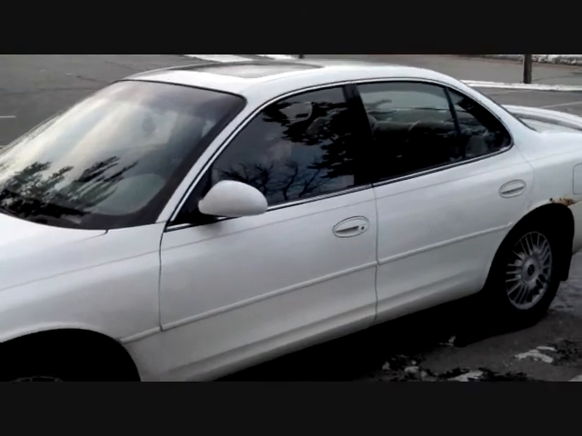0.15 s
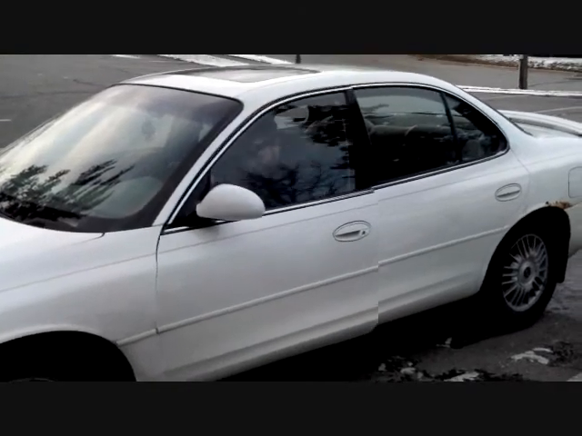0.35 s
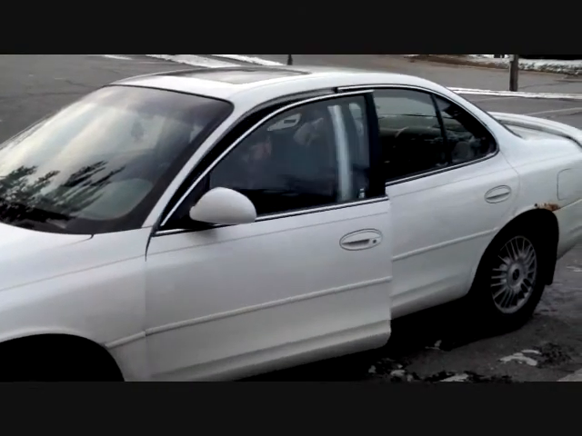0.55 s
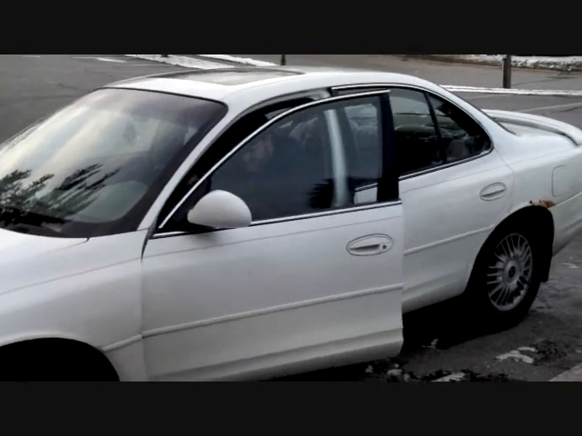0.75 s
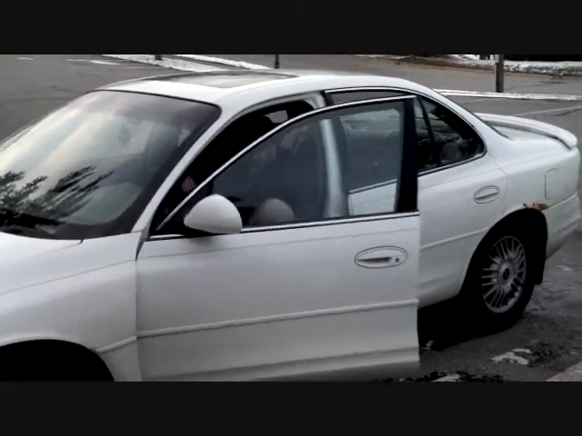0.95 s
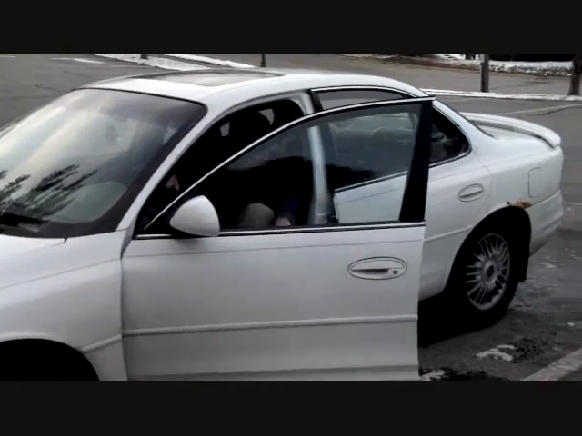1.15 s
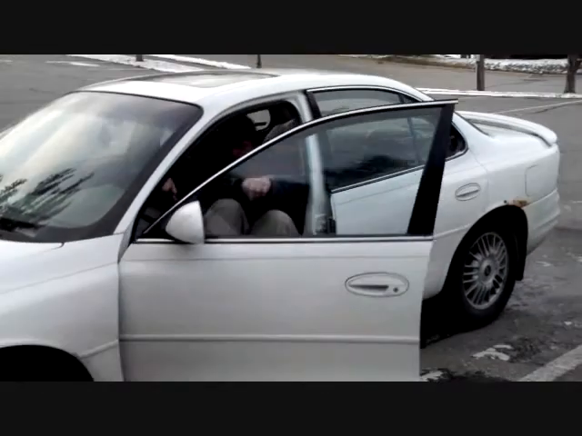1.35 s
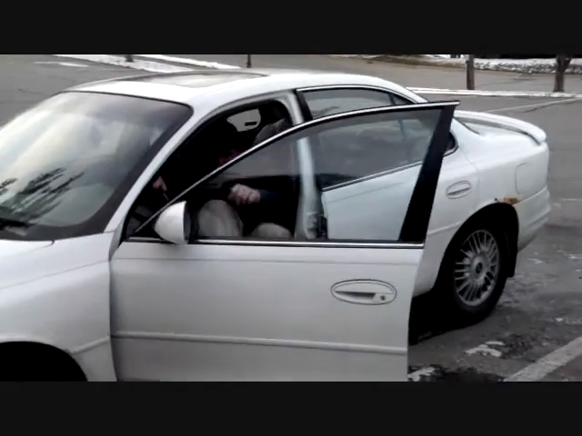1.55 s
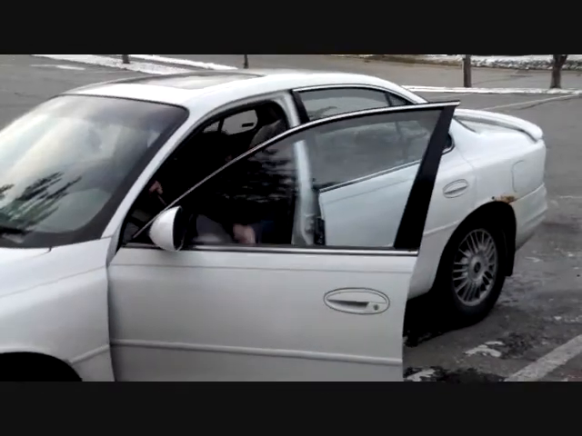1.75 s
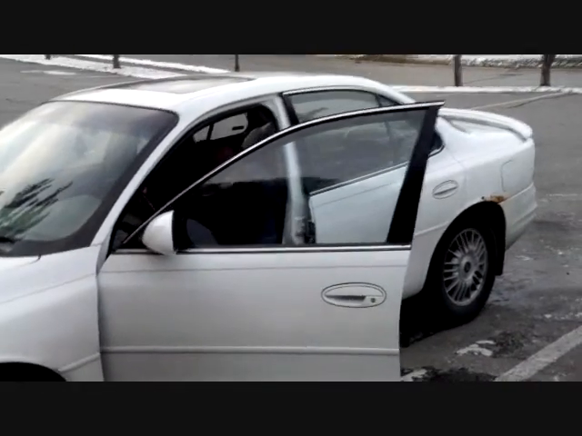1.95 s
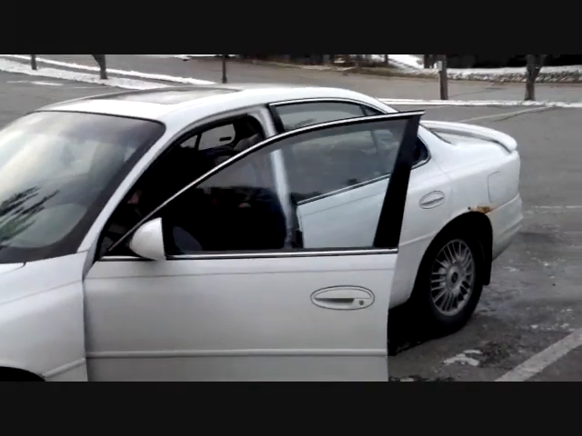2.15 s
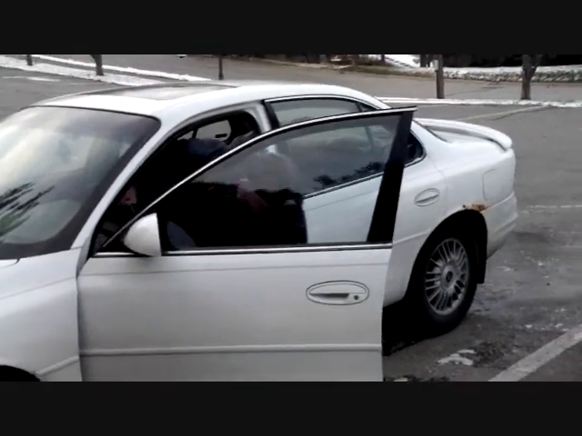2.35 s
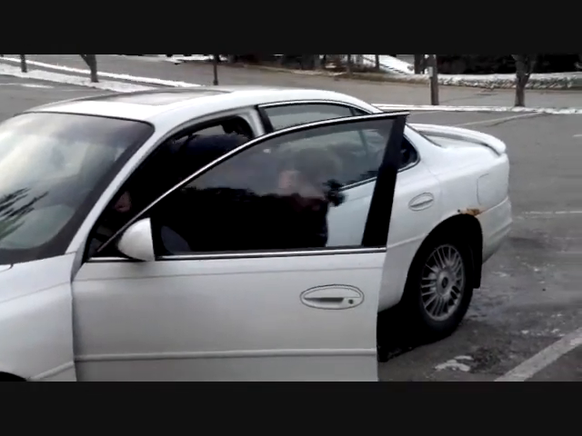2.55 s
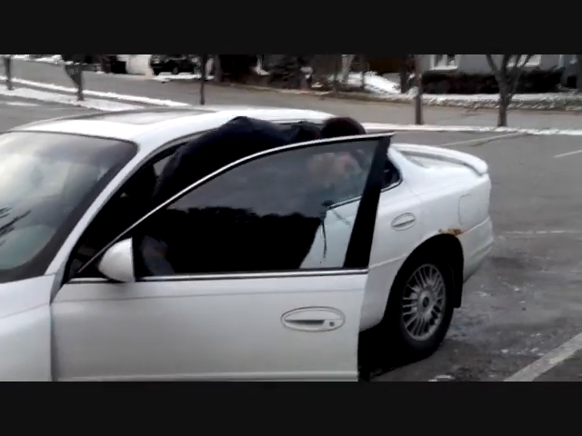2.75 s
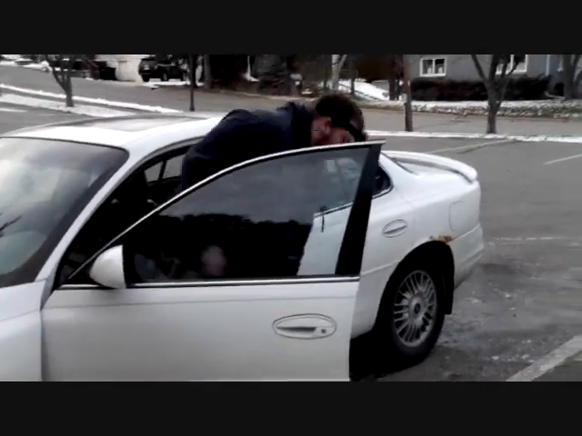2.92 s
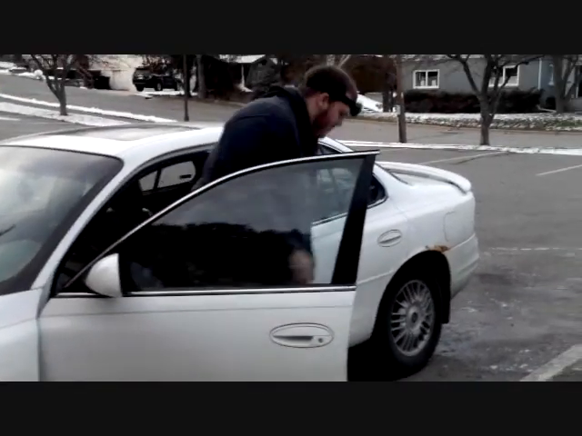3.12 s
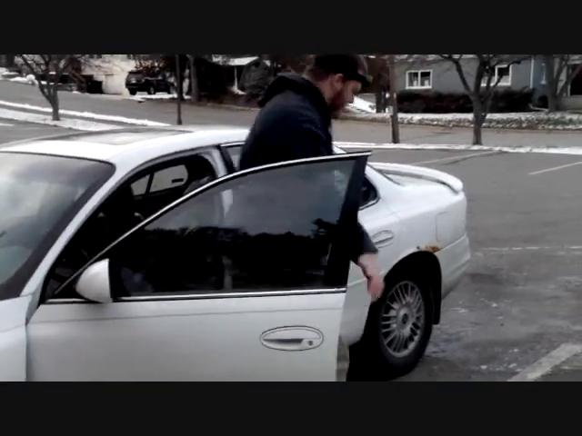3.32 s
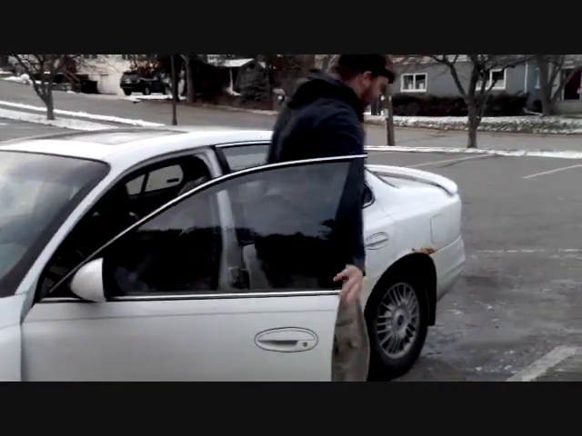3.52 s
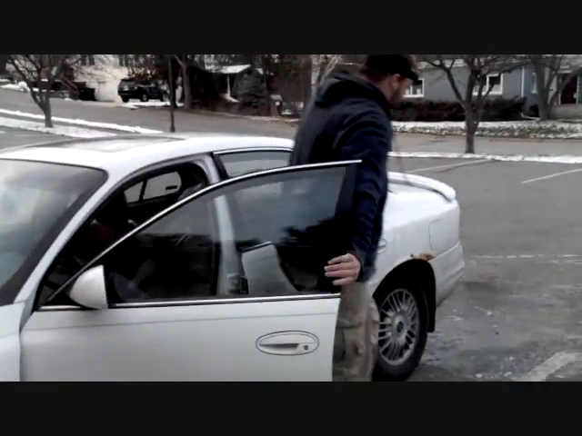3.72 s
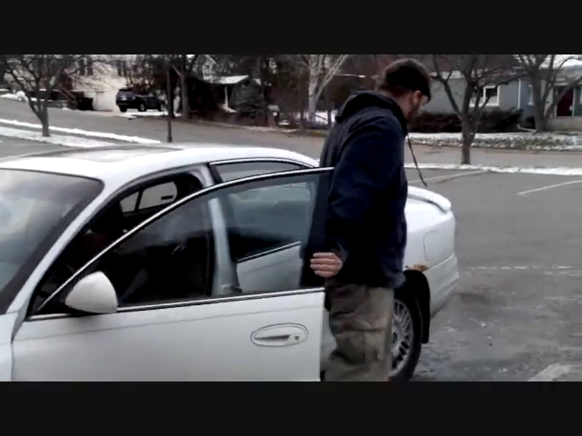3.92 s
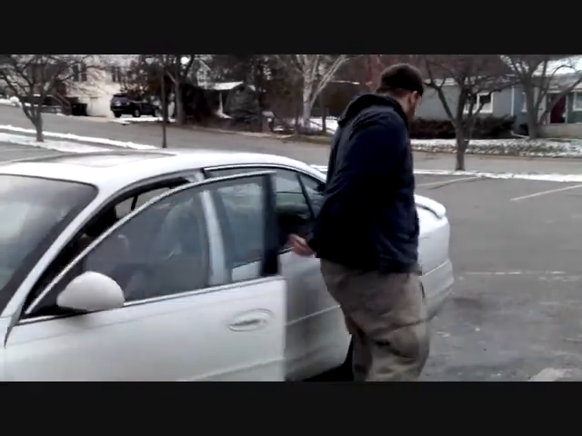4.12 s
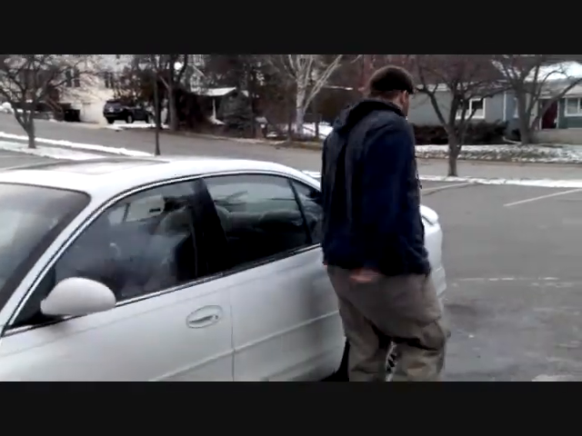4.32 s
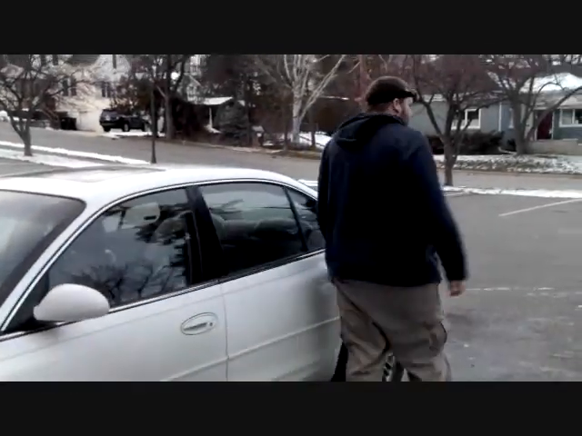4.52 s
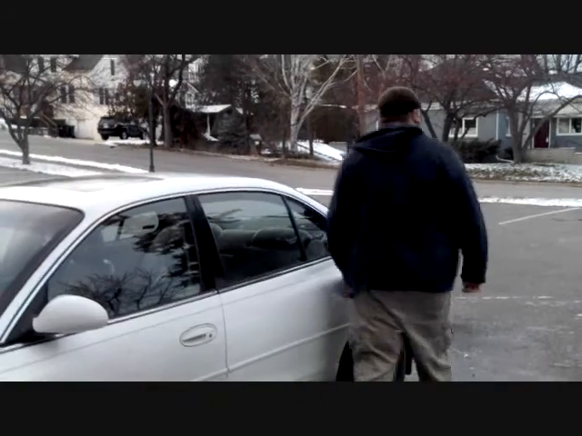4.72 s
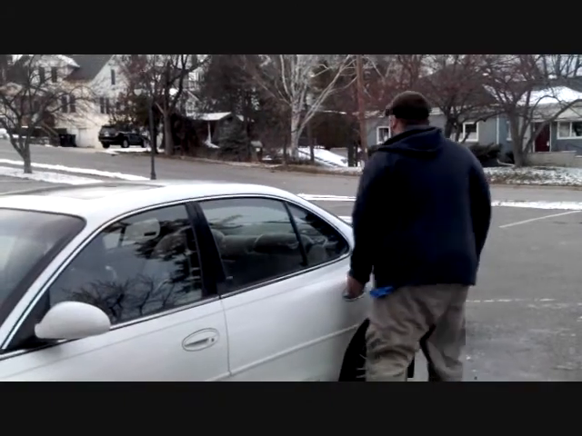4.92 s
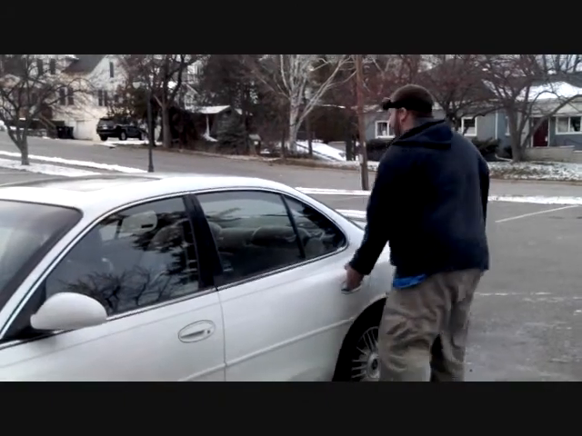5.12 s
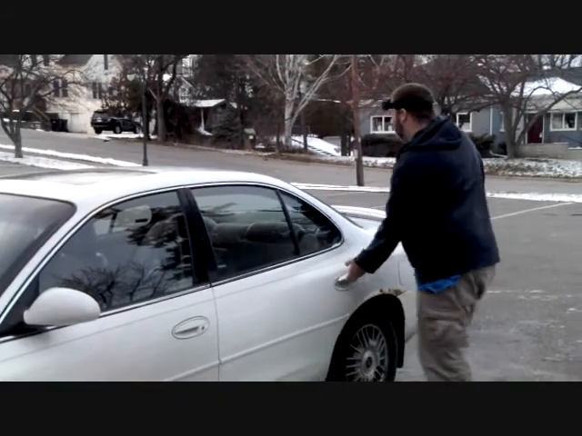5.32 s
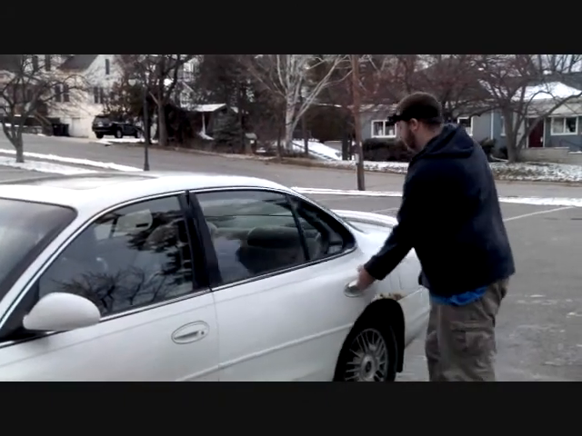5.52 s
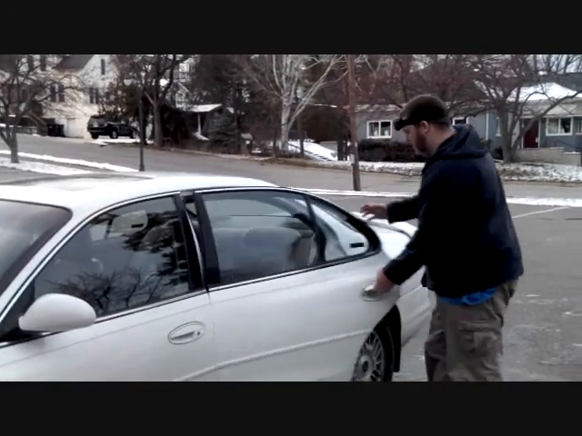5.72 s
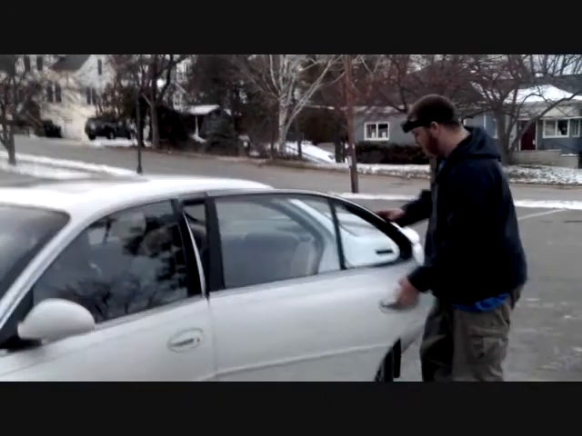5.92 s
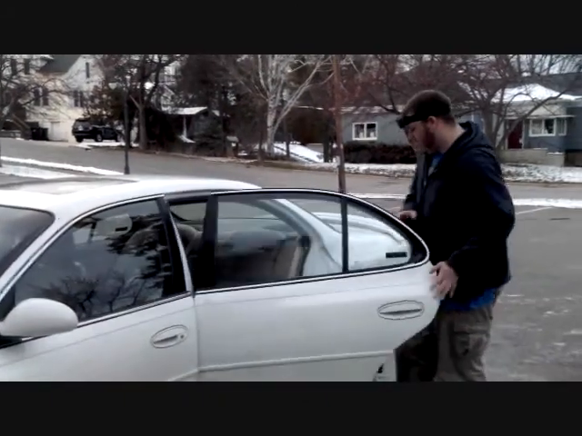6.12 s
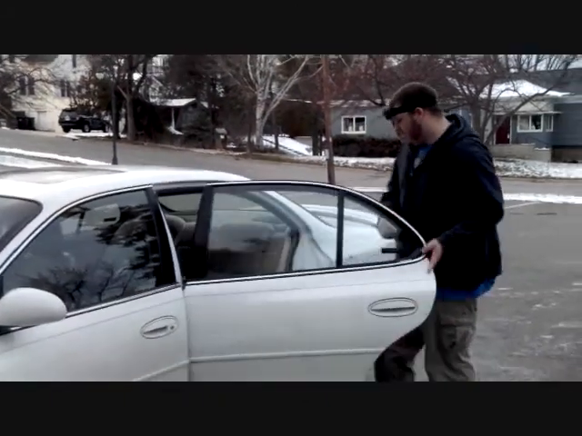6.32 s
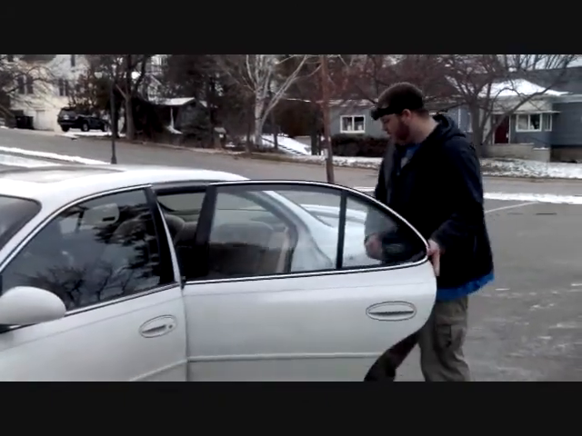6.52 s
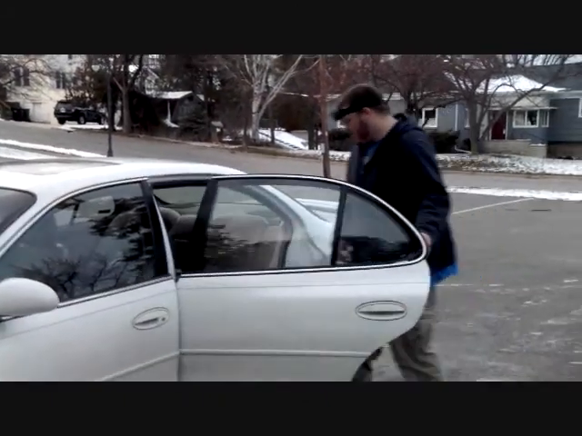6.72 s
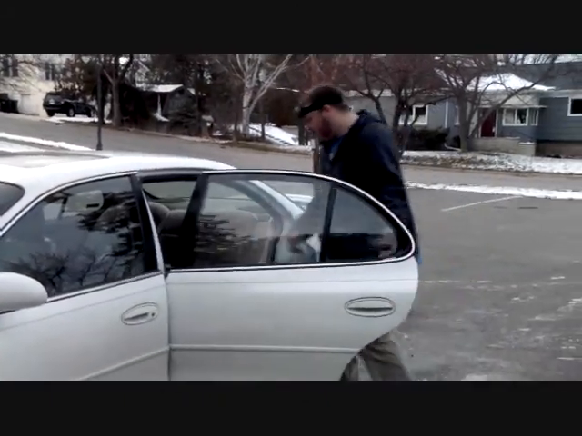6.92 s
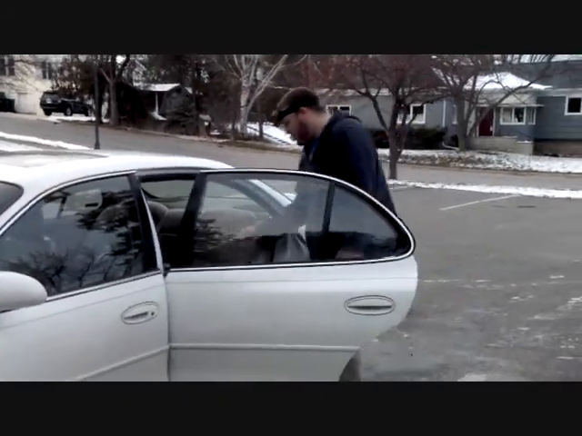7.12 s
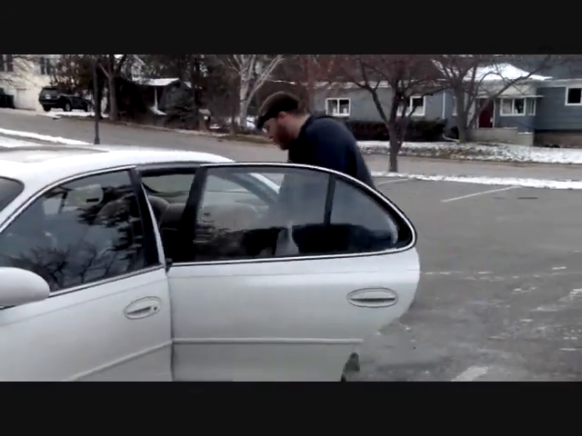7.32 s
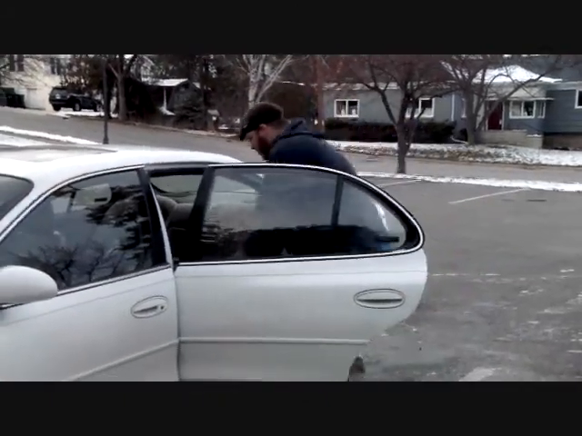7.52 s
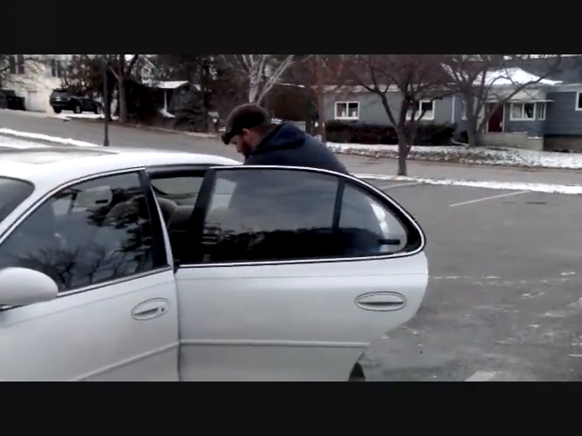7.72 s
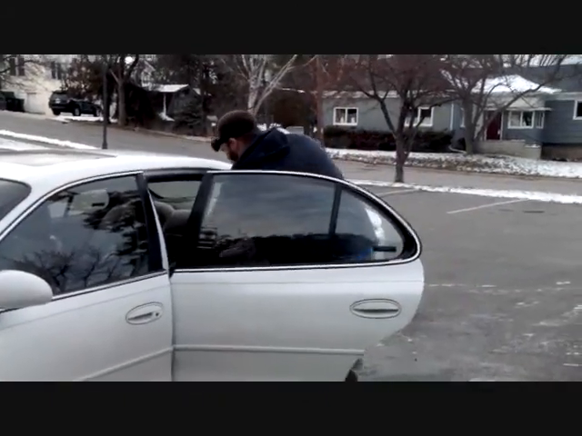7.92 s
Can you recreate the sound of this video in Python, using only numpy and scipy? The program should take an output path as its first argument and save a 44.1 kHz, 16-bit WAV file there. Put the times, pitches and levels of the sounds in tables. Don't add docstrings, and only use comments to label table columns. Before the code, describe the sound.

In a quiet car park, a car door opens with a faint squeak, thumps and slams loudly, followed by a sharp rear handle snap.

```python
import sys
import numpy as np
from scipy import signal
from scipy.fft import rfft, irfft, next_fast_len
from scipy.io import wavfile
from scipy.ndimage import uniform_filter1d

SR = 44100
rng = np.random.default_rng(int(sys.argv[2]) if len(sys.argv) > 2 else 0)


def field_ratio(decibels):
    return 10 ** (np.asarray(decibels, dtype=float) / 20)


def int16_out(signal):
    q = np.round(np.clip(np.atleast_2d(signal).T, -1, 1) * 32767)
    wavfile.write(sys.argv[1], SR, q.astype(np.int16))


N = 355357
FAST = next_fast_len(N)
TIME = np.arange(N) / SR


def add(out, start_s, sound):
    i = int(start_s * SR)
    out[i:i + len(sound)] += sound[:N - i]


def rattle(t60_s, rise_s, rough_db):
    longest = SR // 3
    t = TIME[:min(int(SR * (t60_s + 4 * rise_s)) + 300, longest)]
    grains = rng.standard_normal(longest)[:len(t)]
    grains *= field_ratio(rough_db * rng.exponential(size=longest)[:len(t)])
    grains[int(rise_s * SR)] += 6
    swell = 1 - np.exp(-t / max(rise_s, 1e-4))
    decay = np.exp(-np.log(1000) * t / max(t60_s, .004))
    return grains * swell * decay


def ring(force, modes):
    hz, width_hz, level_db = np.transpose(modes)[:, :, None]
    t = TIME[:int(SR * min(.2, 1.9 / width_hz.min()))]
    level_chance, pitch_chance = rng.standard_normal((len(modes), 2)).T[:, :, None]
    gain = field_ratio(level_db + 2.5 * level_chance) * width_hz
    tones = np.sin(2 * np.pi * hz * (1 + 0.013 * pitch_chance) * t)
    response = np.sum(gain * np.exp(-np.pi * width_hz * t) * tones, axis=0)
    edges = signal.butter(2, [.75 * hz.min(), 1.2 * hz.max()], "band", fs=SR, output="sos")
    y = signal.sosfilt(edges, signal.fftconvolve(force, response))
    return y / np.max(np.abs(y))


# pitch_hz, width_hz, level_db
SKIN_MODES = [(299.4, 38, -5.5), (357.4, 16, 1.5), (404.6, 20, 4), (458, 28, 1.5), (507.4, 13, -2),
              (649, 84, -11.5), (682, 100, -14.5)]
# pitch_hz, width_hz, level_db
FRAME_MODES = [(791, 29, -2), (874, 65, 5.5), (960, 29, -9.5), (1137, 19, -6), (1240, 65, -5.5),
               (1370, 57, -6), (1500, 24, -2.5), (1600, 14, -13), (1740, 10, -15)]
# pitch_hz, width_hz, level_db
LATCH_MODES = [(2370, 67, -10.5), (2780, 180, 0), (3220, 1000, 0.5), (3940, 310, 8), (4680, 610, -7),
               (5450, 890, -1), (6080, 320, -1.5), (6670, 130, -9)]


def door(blows, boom_modes, latch_db, latch_follows, hard_rise_s, boom_slow, latch_quick, damping, soft_per_db):
    out = np.zeros(N)
    damp = [1, damping, 1]
    for start_s, level_db, boom_db, hard_db, t60_s in blows:
        rise_s = hard_rise_s * (0.5 + soft_per_db * max(-14 - level_db, 0))
        skin = ring(rattle(t60_s, rise_s, rough_db=3.5), np.array(SKIN_MODES) * damp)
        boom_force = rattle(t60_s * boom_slow, rise_s * boom_slow, rough_db=1.5)
        boom = ring(boom_force, np.array(boom_modes) * damp)
        frame = ring(rattle(t60_s, rise_s, rough_db=1.5), np.array(FRAME_MODES) * damp)
        latch_force = rattle(t60_s * latch_quick, 2.2 * rise_s, rough_db=2.0)
        latch = ring(latch_force, np.array(LATCH_MODES) * damp)
        latch_part_db = latch_db + latch_follows * hard_db
        for part, part_db in [(skin, 0), (boom, boom_db), (frame, hard_db), (latch, latch_part_db)]:
            add(out, start_s - .001, field_ratio(level_db + part_db) * part)
    return out


# start_s, skin_peak_db, hardness_db re skin
SLAM_BLOWS = [(4.34, -16.5, 4), (4.35, 0, -3.5), (4.362, -3, -9), (4.374, -3, -13), (4.394, -6, -13),
              (4.407, -12, -15), (4.425, -15, -12.5), (4.446, -18.5, -10), (4.469, -24, -5),
              (4.519, -30.5, -6), (4.558, -37, -6), (4.622, -41.5, -5)]
# pitch_hz, width_hz, level_db
SHUT_BOOM_MODES = [(61.6, 19, -0.5), (97.3, 12, 1.5), (121, 9.9, 3), (162.5, 18, 1), (207, 19, -12.5),
                   (228, 15, -1)]


def slam():
    blows = []
    for start_s, level_db, hard_db in SLAM_BLOWS:
        boom_db = -3 - 0.29 * level_db
        t60_s = 0.079 - .002 * level_db
        blows.append((start_s, level_db, boom_db, hard_db, t60_s))
    return door(blows, SHUT_BOOM_MODES, latch_db=-6, latch_follows=.95, hard_rise_s=.0022,
                boom_slow=1.11, latch_quick=1.3, damping=1.86, soft_per_db=0.55)


# start_s, skin_peak_db, boom_db, hardness_db re skin, t60_s
KNOCK_BLOWS = [(3.807, -16.5, -25, -16, 0.09), (3.828, -24, -15, -7, .08), (3.854, -28.5, 0.5, -6.5, .09),
               (3.88, -9, -16.5, -7, 0.086), (3.903, -3, -12, -20, 0.058), (3.925, -2.5, -14, -9.5, 0.054),
               (3.939, -1.5, -15.5, -15, 0.097), (3.969, -10.5, -13.5, -9, .09), (4, -21, 1, -7.5, 0.079),
               (4.029, -21.5, -6, -12.5, .075), (4.045, -24, -9, -16, .13), (4.071, -19, -14, -9.5, 0.22),
               (4.12, -5, -3, -15.5, 0.091), (4.154, -15.5, -19, -18, 0.16), (4.225, -27.5, 0.5, -7, 0.14)]
# pitch_hz, width_hz, level_db
OPEN_BOOM_MODES = [(92, 9.2, -7), (123.6, 8.4, 7), (168, 58, 3), (209.6, 24, 6), (230, 18, -10.5)]


def knocks():
    return door(KNOCK_BLOWS, OPEN_BOOM_MODES, latch_db=-19.5, latch_follows=0.15, hard_rise_s=.0016,
                boom_slow=1.44, latch_quick=0.99, damping=1.0, soft_per_db=0.38)


# start_s, skin_peak_db, boom_db, hardness_db re skin, t60_s
SWING_BLOWS = [(0.51, -27.5, -12, -2, 0.064), (0.525, -24, -1, -19, .06), (0.969, -35.5, -4, -12, 0.14),
               (1.02, -30, -7, -19, 0.15), (1.098, -31.5, 2, -20, 0.095), (1.377, -13.5, -8.5, -12, 0.037),
               (1.39, -21, -9, -14.5, .06), (1.415, -25, -21, -19, .1), (1.474, -31, -15, -8, 0.051),
               (1.518, -28, -12, -11, 0.062), (5.974, -31, 0, -1.5, 0.038), (5.978, -19, -16, -14, 0.054),
               (6.0, -27, -1, -17, 0.19)]


def swings():
    return door(SWING_BLOWS, OPEN_BOOM_MODES, latch_db=-3, latch_follows=1.0, hard_rise_s=.0016,
                boom_slow=1.5, latch_quick=0.99, damping=1.0, soft_per_db=0.4)


# (start_s, peak_db)
ROD_NOTES = [(121, .23, [(.55, -32.5), (1.4, -31.5), (3.885, -8.5), (4.125, -22)]),
             (154, 0.11, [(.24, -33.5), (3.9, -19)]), (205, 0.097, [(4.372, -6.5)]),
             (205, 0.023, [(5.974, -16)]), (285, 0.091, [(4.385, -7)]), (345, .08, [(2.4, -33.5)]),
             (452, .084, [(1.385, -18)]), (494, 0.15, [(3.926, -4), (4.122, -14.5)]),
             (592, .04, [(4.356, -9.5)]), (776, 0.058, [(4.353, -6)]), (886, 0.075, [(1.378, -19.5),
             (3.906, -13)]), (960, 0.035, [(3.808, -26.5), (4.353, -5.5), (4.447, -24)]),
             (1054, 0.11, [(3.83, -27), (3.85, -32)]), (1158, 0.07, [(1.476, -39), (4.024, -28.5)]),
             (1380, .08, [(1.378, -23.5)]), (1496, 0.12, [(4.125, -25.5)]), (1604, 0.12, [(1.377, -26.5),
             (3.881, -21), (3.905, -22), (4.047, -32.5)]), (1870, 0.066, [(2.07, -49)]),
             (2350, .05, [(.512, -40)])]


def rods():
    out = np.zeros(N)
    for hz, t60_s, strikes in ROD_NOTES:
        for start_s, peak_db in strikes:
            force = rattle(t60_s, 1.17 / hz, rough_db=1.5)
            add(out, start_s, field_ratio(peak_db) * ring(force, [(hz, 30, 0), (.965 * hz, 40, -7)]))
    return out


# push_s, signed_peak, pitch_hz, crack_db re push, crack_tilt_db per octave
SNAP_EVENTS = [
    (4.806, 0.068, 890, -7.5, -19),
    (5.7952, -0.61, 610, -6, 8.5),
    (7.1182, 0.24, 553, -21.5, -8),
]


def snaps():
    out = np.zeros(N)
    t = TIME[:SR // 100] - .005
    push_cycles = 1.45
    for push_s, peak, hz, crack_db, tilt_db in SNAP_EVENTS:
        push = np.cos(2 * np.pi * hz * t) * np.exp(-(2.77 * hz * t / push_cycles) ** 2)
        crack_modes = [(f, 700, tilt_db * np.log2(f / 2000)) for f, _, _ in [FRAME_MODES[-3]] + LATCH_MODES]
        crack = ring(rattle(0.012, 0.00023, rough_db=2.5), crack_modes)
        shiver = ring(rattle(0.022, 0.0012, rough_db=6.5), [(1.35 * hz, 300, 0), (2.3 * hz, 500, -12)])
        add(out, push_s - .005, peak * push)
        add(out, push_s - .0016, peak * field_ratio(crack_db) * crack)
        add(out, push_s + 0.00144, peak * field_ratio(-18.5) * shiver)
    return out


# start_s, peak_db, pitch_hz, crack_db re tap
TAP_EVENTS = [(.26, -32, 694, -17), (.335, -44, 1400, -20), (.36, -31.5, 810, -16), (1.118, -36, 1100, -20),
              (1.263, -35.5, 800, -19), (1.474, -33.5, 1250, -9), (1.701, -35, 766, -18),
              (2.224, -31, 930, -14), (2.235, -40, 1490, -6), (2.29, -43, 1460, -10),
              (2.766, -31.5, 1500, -6.5), (3.325, -42.5, 1600, -9), (3.931, -19, 2100, -13),
              (4.841, -37, 700, -14), (5.129, -41, 1320, -10), (5.292, -27.5, 960, -29),
              (5.339, -30.5, 1000, -17), (5.418, -28.5, 1080, -13), (5.431, -34, 710, -15),
              (5.458, -35, 900, -10), (5.976, -31, 1400, -20), (7.069, -35, 700, -18),
              (7.246, -37.5, 1000, -25), (7.839, -39, 1600, -13)]


def taps():
    out = np.zeros(N)
    t60_s = 0.037
    for start_s, peak_db, hz, crack_db in TAP_EVENTS:
        thud_modes = [(0.54 * hz, 200, -4), (hz, 250, 0), (1.5 * hz, 250, -9)]
        thud = ring(rattle(t60_s, 0.001, rough_db=1.0), thud_modes)
        crack = ring(rattle(t60_s * 0.94, 0.00064, rough_db=1.0), LATCH_MODES[:4])
        add(out, start_s - .001, field_ratio(peak_db) * thud)
        add(out, start_s - .001, field_ratio(peak_db + crack_db) * crack)
    return out


# start_s, peak_db, pitch_hz, t60_s
TICK_EVENTS = [(0.373, -36, 3900, .035), (1.3653, -40, 2110, .05), (1.8456, -43.5, 4100, .12),
               (1.8744, -49, 3500, .05), (1.94, -46, 3900, .035), (2.0617, -38, 3750, .1),
               (2.0796, -51, 2650, .05), (2.094, -45, 4000, .05), (2.249, -43, 3980, .07),
               (2.7064, -40, 3900, .08), (2.7294, -43, 3900, .08), (2.749, -42, 4100, .12),
               (2.77, -34, 4000, .05), (2.793, -36, 3940, .05), (2.867, -40, 4000, .03),
               (3.291, -42.5, 3940, .05), (3.325, -42, 3970, .07), (3.47, -45, 4590, .045),
               (3.79, -47, 4060, .05), (4.06, -40, 4000, .1), (4.893, -33, 2700, .035),
               (4.909, -44, 3030, .065), (5.457, -33, 4030, .037), (5.8606, -44, 4050, .04),
               (5.978, -29, 3950, .04), (6.0771, -46, 4000, .04), (7.3003, -48, 4000, .05)]


def ticks():
    out = np.zeros(N)
    for start_s, peak_db, hz, t60_s in TICK_EVENTS:
        tick = ring(rattle(t60_s, 0.004, rough_db=3.), LATCH_MODES[1:6] + [(hz, 150, 15)])
        add(out, start_s - .001, field_ratio(peak_db) * tick)
    return out


def walk(rate_hz):
    k = int(SR / rate_hz)
    held = np.repeat(rng.standard_normal(N // k + 1), k)
    return 1.34 * uniform_filter1d(uniform_filter1d(held, k), k)[:N]


# time_s, pitch_hz, level_db
SQUEAK_PATH = [(.383, 2150, -68), (.392, 2190, -57), (.44, 2250, -54), (.455, 2580, -58), (.462, 2620, -72)]
OVERTONES_DB = [-14, -13]


def hinge():
    time_s, pitch_hz, level_db = np.transpose(SQUEAK_PATH)
    hz = np.interp(TIME, time_s, pitch_hz) * (1 + 0.0074 * walk(200))
    phase = 2 * np.pi * np.cumsum(hz) / SR
    tone = np.sin(phase)
    for harmonic, overtone_db in enumerate(OVERTONES_DB, 2):
        tone = tone + field_ratio(overtone_db) * np.sin(harmonic * phase)
    heard_db = np.interp(TIME, time_s, level_db, left=-120, right=-120) + 4 * walk(220)
    return np.sqrt(2) * tone * field_ratio(heard_db)


def shaped(table):
    hz, level_db = np.transpose(table)
    f = np.fft.rfftfreq(FAST, 1 / SR) + 1
    colour_db = np.interp(np.log(f), np.log(hz), level_db, left=-90, right=-90)
    y = irfft(rfft(rng.standard_normal(FAST)) * field_ratio(colour_db), FAST)
    return y[:N] / np.std(y)


# pitch_hz, level_db per Hz
TOWN_COLOUR = [(33, -22.5), (64, -10.5), (262, -11.5), (560, -21), (950, -26), (1400, -32.5), (1800, -45.5),
               (3300, -65)]
# time_s, level_db
TRAFFIC_SWELL = [(0, -1), (.45, 5.5), (1, 2.5), (1.5, 4), (1.9, 3), (2.4, -3.5), (2.9, -5), (3.7, -1.5),
                 (4.9, 0), (5.5, 0.5), (6.1, -2.5), (6.8, -3.5), (7.3, -0.5), (7.7, -4), (8.06, -1)]
# level_db, share of the swell
LAYER_LEVELS = [
    (-47, 0.22),
    (-46, 1),
    (-50, 0.19),
]


def town():
    noise = rfft(shaped(TOWN_COLOUR), FAST)
    octave = np.log2(np.fft.rfftfreq(FAST, 1 / SR) + 1)
    layers, shared = np.zeros((3, N)), walk(6.7)
    for centre in np.arange(5, 11.6, .5):
        window = np.clip(1 - 2 * np.abs(octave - centre), 0, 1)
        band = irfft(noise * window, FAST)[:N]
        layers[np.digitize(centre, [7.4, 8.7])] += band * field_ratio(1.5 * walk(9) + 1.2 * shared)
    swell_db = np.interp(TIME, *np.transpose(TRAFFIC_SWELL))
    out = np.zeros(N)
    for layer, (level_db, share) in zip(layers, LAYER_LEVELS):
        out += layer / np.std(layer) * field_ratio(level_db + share * swell_db)
    return out


# (centre_s, length_s, level_db)
HUM_TONES = [(118.6, [(1.5, 1.1, -46.5), (2.8, 1, -51.5), (3.9, .9, -47.5)]), (321, [(1.7, 0.55, -53.5),
             (2.7, .5, -57.5), (3.3, 0.66, -52.5)]), (150, [(.95, 0.53, -46)]),
             (504, [(2.49, 0.63, -52.5)]), (1367, [(1.2, 0.81, -57.5), (2.1, 0.67, -61), (3.0, 0.86, -65.5),
             (3.9, 0.81, -58.5)])]


def machine():
    out = np.zeros(N)
    for hz, swells in HUM_TONES:
        phase = 2 * np.pi * np.cumsum(hz + 1.2 * walk(3)) / SR
        heard = sum(field_ratio(db) * np.exp(-(2 * (TIME - centre_s) / length_s) ** 2)
                    for centre_s, length_s, db in swells)
        out += np.sqrt(2) * np.sin(phase) * heard * field_ratio(1.6 * walk(6.87))
    whirr_hz, fade_start_s, fade_db_per_s = 708, 1, 7.5
    whirr = shaped([(0.9 * whirr_hz, -25), (whirr_hz, 0), (1.15 * whirr_hz, -25)])
    return out + whirr * field_ratio(-50.5 - fade_db_per_s * np.maximum(TIME - fade_start_s, 0))


def scene():
    car = slam() + knocks() + swings() + rods() + snaps()
    small_parts = taps() + ticks() + hinge()
    return (car + small_parts + town() + machine())[None]


def top_cut(x):
    return signal.sosfilt(signal.butter(12, 8140, fs=SR, output="sos"), x)


# pitch_hz, level_db per Hz
HISS_COLOUR = [(880, -33), (1500, -3.5), (2130, -2.5), (3890, -3.5), (7140, -3.5), (7990, -10),
               (10400, -47), (17600, -120)]


def record(dry):
    offset, clip_at = .1315, .78
    hiss = field_ratio(-57.5) * shaped(HISS_COLOUR)
    clipped = np.clip(dry + hiss + offset, -clip_at, clip_at)
    top = signal.ellip(10, .2, 60, 7850, fs=SR, output="sos")
    mix = signal.sosfiltfilt(top, clipped)
    return top_cut(mix)


dry = scene()
out = record(dry)
int16_out(out)
```